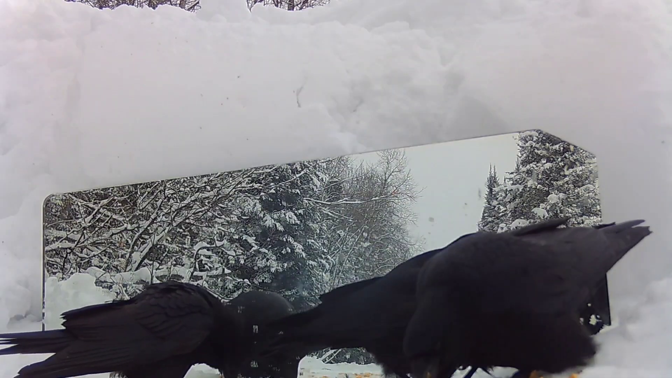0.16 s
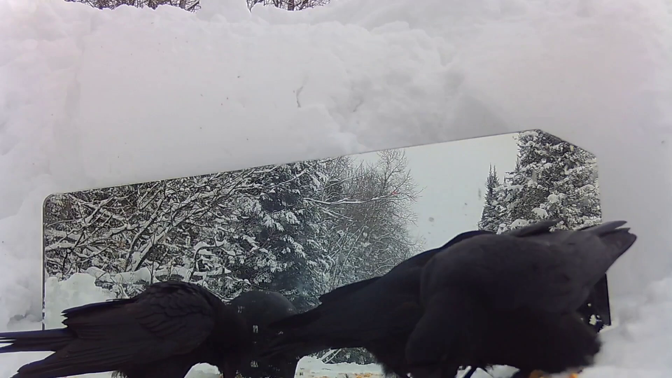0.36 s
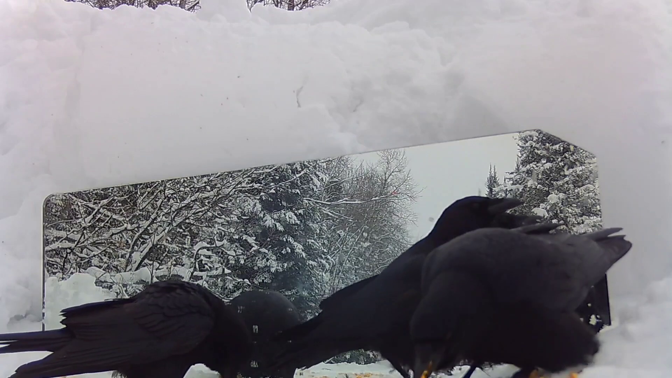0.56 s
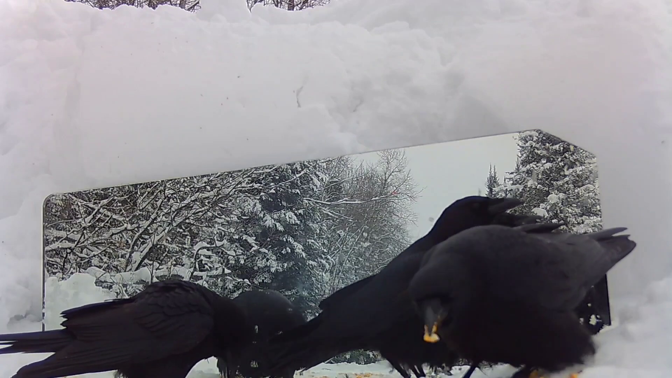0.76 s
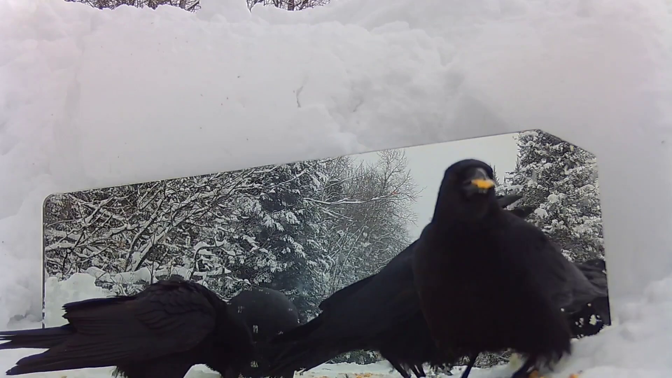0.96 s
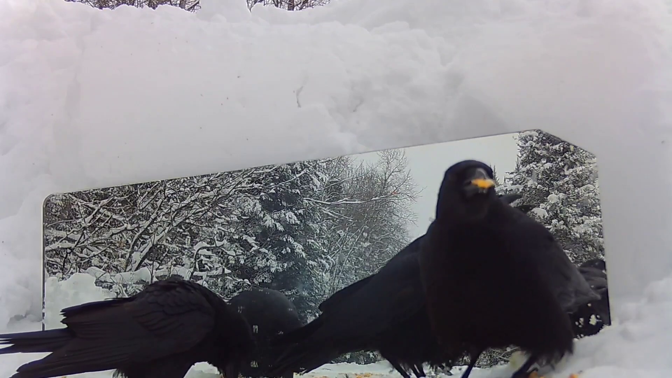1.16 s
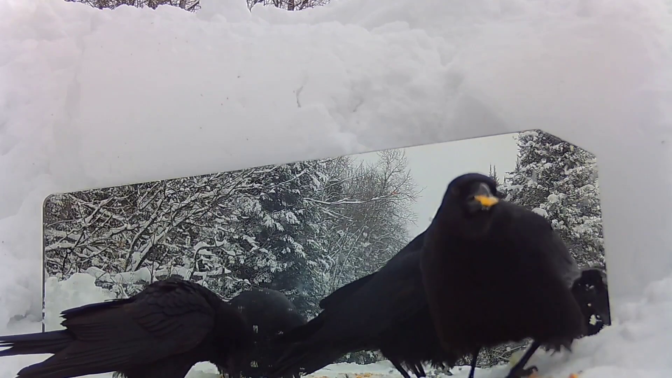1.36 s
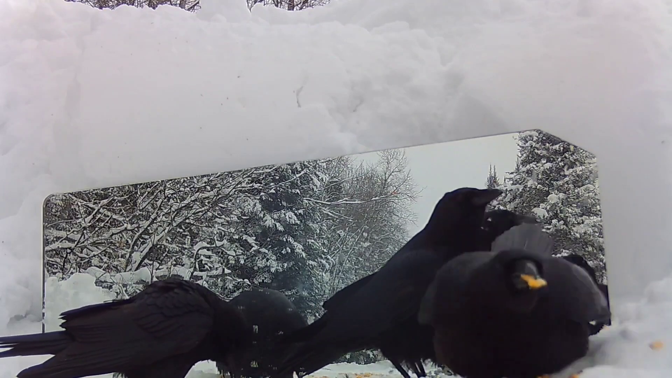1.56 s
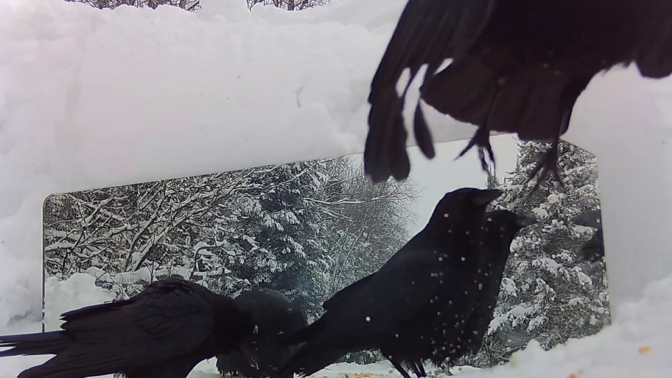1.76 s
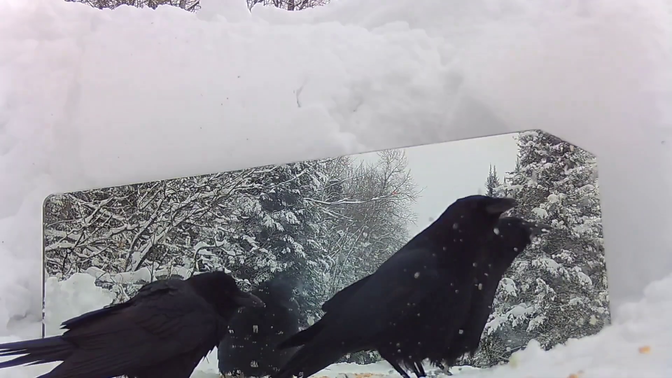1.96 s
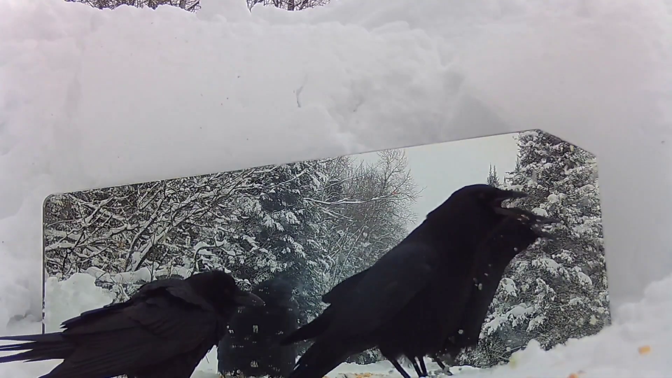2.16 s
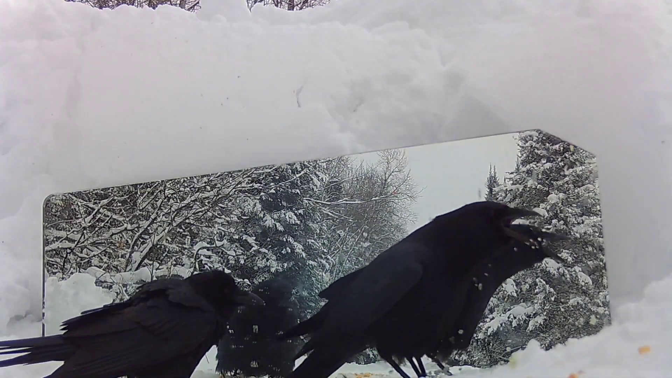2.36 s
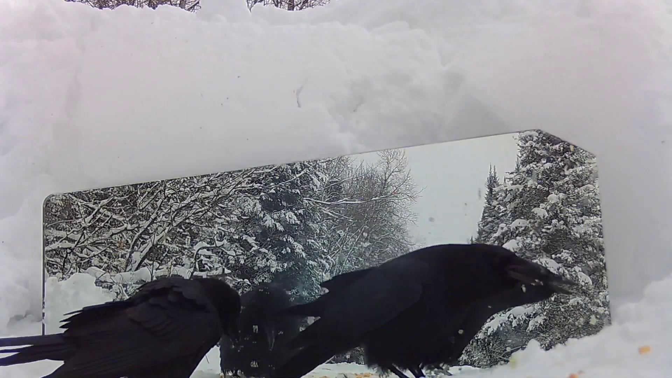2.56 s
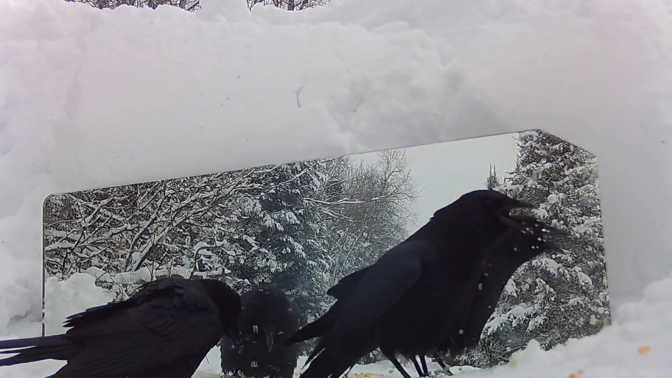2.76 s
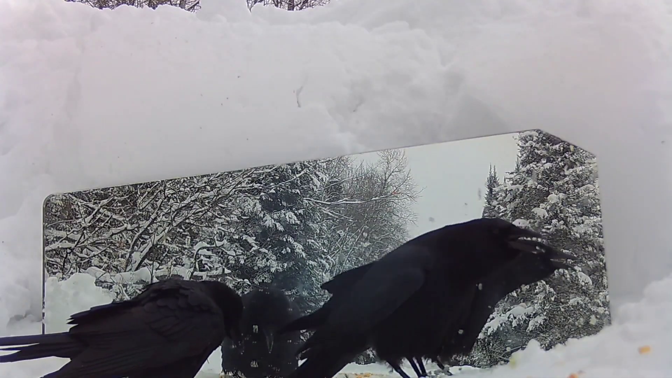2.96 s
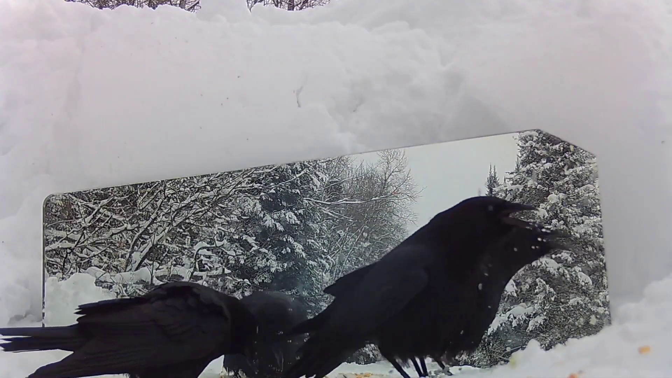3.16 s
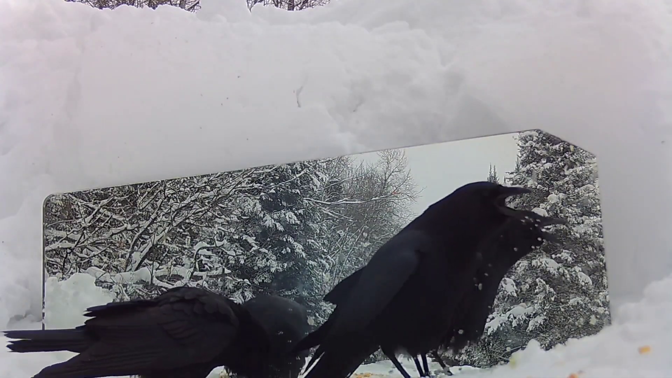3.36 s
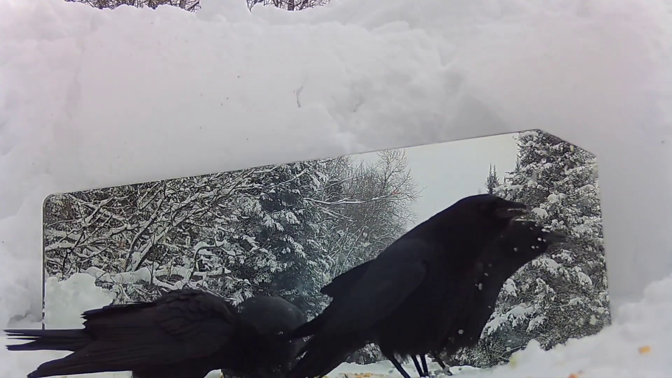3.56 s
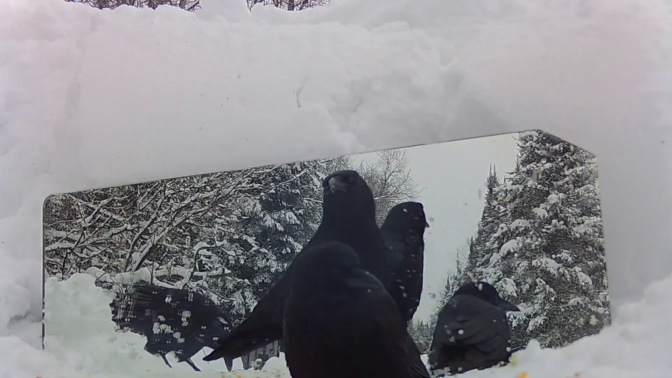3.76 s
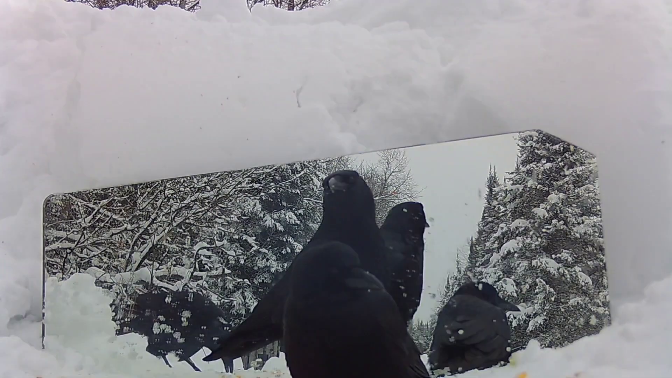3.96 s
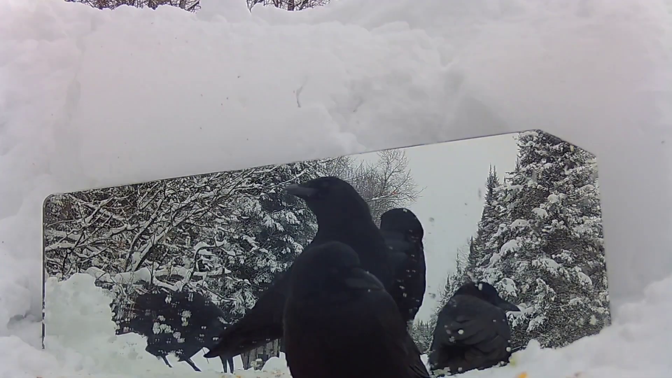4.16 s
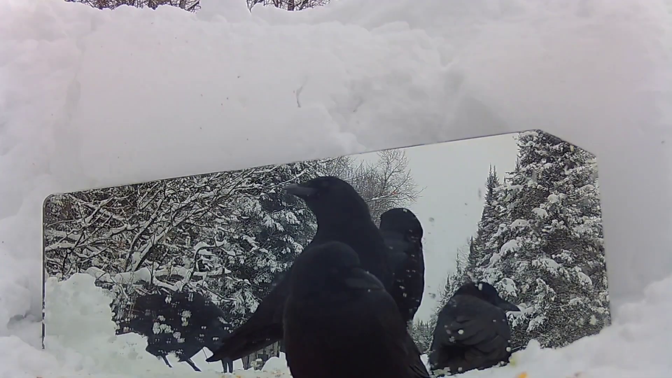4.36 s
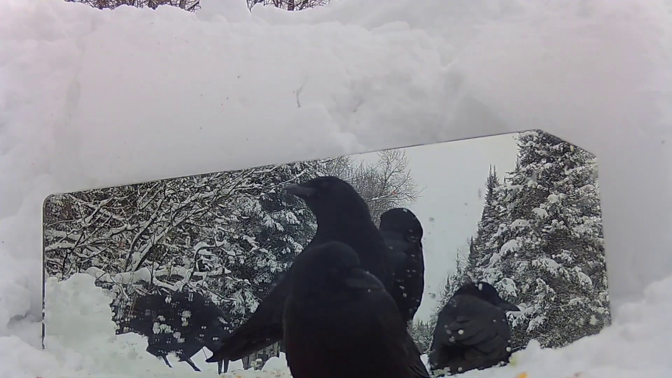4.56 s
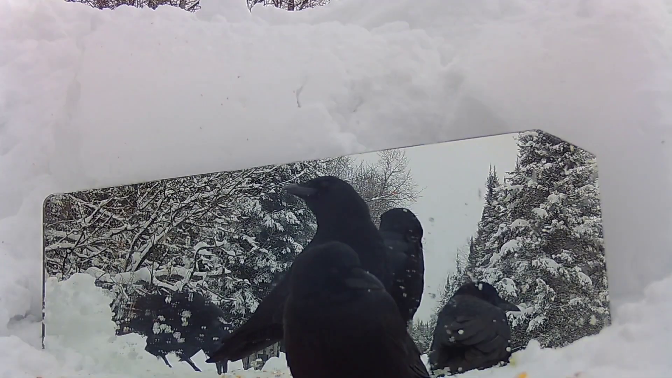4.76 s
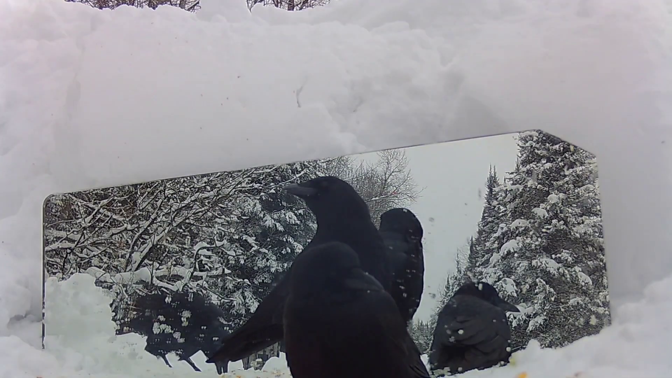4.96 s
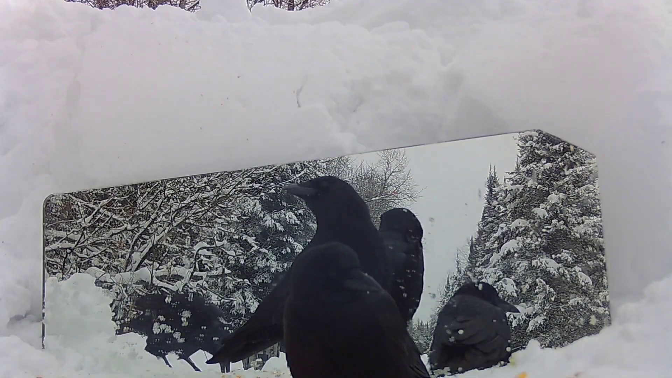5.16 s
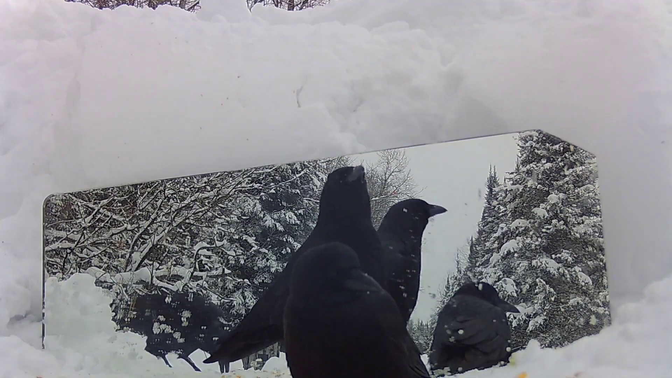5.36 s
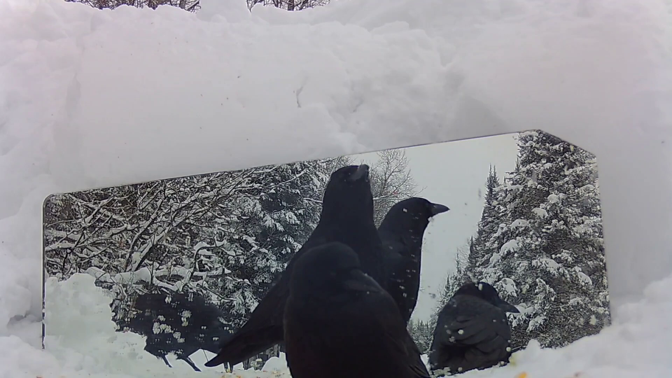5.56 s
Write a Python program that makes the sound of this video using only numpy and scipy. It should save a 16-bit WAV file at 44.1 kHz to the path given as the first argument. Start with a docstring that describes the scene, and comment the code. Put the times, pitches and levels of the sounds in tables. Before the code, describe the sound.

Crows peck faintly at snow over a soft outdoor hiss. One takes off, its wings swishing and buffeting the microphone. Another then caws three times, loud, harsh and so close that the sound distorts slightly, with soft breaths between and a low thump after the first caw. Afterwards a faint distant rumble and a few more light pecks remain.

```python
"""Small pecks over a faint hiss: crows feed on snow beside a microphone. One flies off, its wings swishing and
buffeting the microphone. Another caws three times, breathing in between. Each caw is a train of syrinx snaps
ringing throat and beak, so close that the input overloads; the trees answer faintly. After a brief silence the
scene changes: a distant rumble and a few more pecks."""
import sys
import numpy as np
from scipy import signal
from scipy.fft import rfft, irfft
from scipy.io import wavfile
from scipy.ndimage import map_coordinates

SR = 44100
rng = np.random.default_rng(int(sys.argv[2]) if len(sys.argv) > 2 else 0)


def to_wav(sig):
    """Store sig (one row per channel, or 1-D mono) as 16-bit WAV at the path in sys.argv[1].

    Samples outside -1..1 are clipped; the rate is SR.
    """
    pcm = np.clip(np.atleast_2d(sig), -1, 1) * 32767
    pcm = np.round(pcm).astype(np.int16)
    wavfile.write(sys.argv[1], SR, pcm.T)  # frames by channels


N = 246959
TIME = np.arange(N) / SR
SILENCE_START_S, SILENCE_END_S = 3.7, 3.738


def amp(db):
    """Decibels to gain."""
    return 10 ** (np.asarray(db) / 20)


def unit_rms(x):
    """Scales to rms 1."""
    return x / np.sqrt(np.mean(x ** 2) + 1e-20)


def add(mix, start_s, sound):
    """Adds a sound to the mix at start_s."""
    part = mix[round(start_s * SR):][:len(sound)]
    part += sound[:len(part)]


def noise(spectrum):
    """Noise of rms 1, shaped by rows of (frequency [Hz], level [dB])."""
    hz, db = np.transpose(spectrum)
    gain = amp(np.interp(np.log(np.fft.rfftfreq(N, 1 / SR) + 1), np.log(hz + 1), db))
    return unit_rms(irfft(rfft(rng.standard_normal(N)) * gain, N))


def wander(count, rate_hz):
    """Random drift of rms 1, low-passed at rate_hz."""
    hz = np.fft.rfftfreq(count, 1 / SR)
    return unit_rms(irfft(rfft(rng.standard_normal(count)) / (1 + (hz / rate_hz) ** 4), count))


def swells(rows):
    """One gain curve per row: exponential rise to a peak, exponential fall."""
    return np.array([amp(db) * np.exp(-np.maximum((s - TIME) / rise_s, (TIME - s) / fall_s).clip(0, 50))
                     for s, db, rise_s, fall_s, *_ in rows])


def minimum_phase(db):
    """Spectra of the quickest responses with these gains, one per row."""
    cepstrum = irfft(np.log(amp(db)))
    half = cepstrum.shape[1] // 2
    fold = np.r_[1, np.full(half - 1, 2), 1, np.zeros(half - 1)]
    return np.exp(rfft(cepstrum * fold))


# hiss spectrum: (frequency [Hz], level [dB])
HISS_SPECTRUM = [(20, 5), (36, 5.5), (60, -3.5), (100, 0), (300, -7.5), (600, -9.5), (1500, -12),
                 (7000, -12.5), (16000, -14)]


def hiss(level_db=-59.5):
    """Steady background hiss."""
    return amp(level_db) * noise(HISS_SPECTRUM)


# rumble spectrum: (frequency [Hz], level [dB])
RUMBLE_SPECTRUM = [(22, -3), (43, -4.5), (62, 1), (78, 5.5), (112, -7.5), (150, -4), (180, -9), (262, -6),
                   (340, -14.5), (620, -17), (1300, -16.5), (2600, -31.5), (5000, -62)]


def rumble(level_db=-53, onset_s=.01713, fade_db_per_s=.9639, waver_db=1.0):
    """A far rumble like traffic enters after the silence and slowly recedes."""
    since_s = TIME - SILENCE_END_S
    sound = np.clip(since_s / onset_s, 0, 1) * noise(RUMBLE_SPECTRUM)
    return sound * amp(level_db - fade_db_per_s * since_s - waver_db * wander(N, 13))


# crunch spectrum: (frequency [Hz], level [dB])
PECK_SPECTRUM = [(200, 13.5), (600, -17.5), (1300, -1.5), (2600, -13.5), (4200, -3), (6500, 4), (8500, -3),
                 (11000, -4.5), (15000, -18)]
# pecks, claw taps, feather snaps at take-off: (time [s], relative level [dB], t60 [s], high-pass [Hz])
PECKS = [(.272, -38, .015, 6000), (.281, -31, .04, 900), (.29, -43, .05, 1200), (.956, -40, .05, 300),
         (1.361, -43, .04, 2500), (1.571, -43, .03, 5000), (1.7855, -20, .05, 1400),
         (1.924, -22.5, .03, 1000), (1.985, -27, .04, 1200), (4.3077, -35, .025, 4200),
         (4.7207, -41, .03, 3500), (4.742, -43, .03, 3500), (5.0435, -48, .04, 4000),
         (5.18, -48, .03, 4500), (5.278, -45, .09, 4500)]


def pecks(gain_db=-6):
    """Each tap is a sharp, fast-decaying crunch; light taps lack the low knock."""
    out, crunch, t = np.zeros(N), noise(PECK_SPECTRUM), np.arange(SR // 5) / SR
    for start_s, db, t60_s, low_hz in PECKS:
        tap = crunch[round(start_s * SR):][:len(t)] * amp(db + gain_db - 60 * t / t60_s)
        add(out, start_s, signal.sosfilt(signal.butter(2, low_hz, "high", fs=SR, output="sos"), tap))
    return out


# wing strokes of the departing bird: (time [s], peak [dB], rise [s], fall [s])
WING_STROKES = [(1.58, -58, .05, 0.0519), (1.725, -46.5, 0.039, 0.034), (1.795, -36, 0.016626, 0.038),
                (1.88, -45.5, 0.028, 0.0792), (1.99, -35.5, 0.053, 0.02264), (2.075, -40.5, 0.047, 0.093)]
# wing swish spectrum: (frequency [Hz], level [dB])
WING_SPECTRUM = [(240, -9.5), (400, -9), (777, -9.5), (1090, -11.5), (1510, -9.5), (2290, -11.5),
                 (5350, -5.5), (6440, -1.5), (9320, -5), (14800, -24), (16000, -33)]
# one rustle at take-off, then the crow's breaths: (time [s], peak [dB], rise [s], fall [s])
SOFT_HISSES = [(1.715, -45, 0.03975, 0.041), (2.67, -43.5, .07, 0.009707), (3.01, -49, .03, 0.09675),
               (3.17, -48.5, 0.064, 0.0091), (3.545, -53, .06, .035)]
# their spectrum: (frequency [Hz], level [dB])
SOFT_HISS_SPECTRUM = [(1470, -42), (2500, -11.5), (2850, -19), (3380, -5.5), (4050, -9.5), (5150, -7),
                      (6810, 6), (15200, -27), (16000, -18.5)]


def wings_and_breaths(grain_db=2.5, grain_hz=110):
    """Wings swish and rustle at take-off; the crow's breaths hiss softly between and after caws."""
    wings = np.linalg.norm(swells(WING_STROKES), axis=0) * noise(WING_SPECTRUM)
    hisses = np.linalg.norm(swells(SOFT_HISSES), axis=0) * noise(SOFT_HISS_SPECTRUM)
    return (wings + hisses) * unit_rms(amp(grain_db * wander(N, grain_hz)))


# wing gusts and bass swells: (time [s], peak [dB], rise [s], fall [s], upper edge [Hz])
LOW_THUDS = [(1.72, -44, 0.029, 0.024738, 36), (1.805, -35, 0.009364, 0.041906, 170),
             (1.975, -27, 0.028, .025, 49.98), (2.0, -34, 0.013, 0.017, 120),
             (2.2, -29.5, 0.08202, 0.082, 48), (2.53, -19, .1, .045, 179.8),
             (2.587, -14.5, .006, .014, 176.1), (2.77, -25, 0.03965, 0.12, 53.94),
             (2.962, -28, .012, .055, 70.26), (3.28, -23.5, 0.034, 0.059, 54)]


def low_thuds():
    """Low noise: wing gusts on the microphone, and bass swells where the caws overload the input."""
    power = swells(LOW_THUDS) ** 2
    edge_hz = np.array(LOW_THUDS)[:, -1] @ power / power.sum(0)  # the strongest thud dominates
    bass = noise([(20, 0), (70, -1.5), (200, -5.5), (500, -19.5), (1000, -32), (4000, -77)])
    position = np.cumsum(edge_hz) / 200  # shifts the 200 Hz corner to edge_hz
    return np.sqrt(power.sum(0)) * map_coordinates(bass, [position], order=3, mode="wrap")


def thump(at_s=2.588, width_s=.0029, gain_db=-7):
    """The closest gust lands on the microphone as one push and suck of air."""
    u = (TIME - at_s) / width_s
    return -amp(gain_db) * u * np.exp(-u ** 2 / 2)


def echoes(voice, near_db=-22, near_t60_s=.02, far_db=-43, far_t60_s=.85, build_s=.0091, dull_hz=2300):
    """A snowbank and a mirror scatter a brief echo; tree trunks a faint, dull, longer one."""
    t = np.arange(SR) / SR
    taps = rng.standard_normal(SR) * (rng.random(SR) < .05)
    far = taps * amp(-60 * t / far_t60_s) * (1 - np.exp(-t / build_s))
    far = signal.sosfilt(signal.butter(2, dull_hz, fs=SR, output="sos"), far / np.linalg.norm(far))
    near = taps * amp(-60 * t / near_t60_s)
    response = amp(far_db) * far + amp(near_db) * near / np.linalg.norm(near)
    return signal.fftconvolve(voice, response)[:N]


def gesture(t, length_s, held_hz, lift_hz, release_s, first_db,
            gap_s=.0098, attack_s=.011, accent_s=.075, sag_hz=84.846, sag_db_per_s=7.5, fade_s=.015):
    """Pitch, effort and treble of a caw: lone snap, attack, accent, sagging hold, slackening release."""
    after_gap_s = np.maximum(t - gap_s, 0)
    attack = np.exp(-after_gap_s / attack_s)
    accent = np.exp(-(np.log(t / accent_s + 1e-9) / .6) ** 2)  # swells fast, ebbs slowly
    push = accent ** 2.5  # effort peaks more briefly than pitch
    release = np.exp((t - length_s) / release_s)
    fade = np.exp((t - length_s) / fade_s)
    pitch_hz = held_hz - sag_hz * t / length_s + lift_hz * accent
    pitch_hz = pitch_hz * (1 - .6 * attack) * (1 - .57 * release)
    effort_db = -6 * attack + 6.5 * push - sag_db_per_s * t - 24 * fade
    treble_db = -3 * push - 3 * np.exp(-after_gap_s / .014)  # swells in, dips on the accent
    pitch_hz[t < gap_s] = 1 / gap_s  # lone opening snap
    effort_db[t < gap_s / 2] = first_db
    return pitch_hz, effort_db, treble_db


def syrinx_snaps(clock_s, pitch_hz, flutter, flutter_hz=56, slack_hz=450, jitter=.021):
    """Snap times of the syrinx: hoarsest when taut, fluttering more deeply as it slackens."""
    t = np.arange(clock_s[0], clock_s[-1], 1 / SR)
    hz = np.interp(t, clock_s, pitch_hz)
    angle = 2 * np.pi * np.cumsum(flutter_hz * (1 + .05 * wander(len(t), 30))) / SR
    sway = (np.sin(angle) + .35 * np.sin(2 * angle)) * np.minimum(slack_hz / hz, 1) ** 2
    hoarseness = jitter * (hz / 560) ** 2 * wander(len(t), 400)
    cycles = np.cumsum(hz * (1 + flutter * sway + hoarseness)) / SR
    return np.interp(np.arange(cycles[-1]), cycles, t)


# the throat's single strong resonance: (frequency [Hz], level [dB])
THROAT_RESPONSE = [(60, -33.5), (430, -11), (700, -25), (1020, -15.5), (1280, 3), (1510, -0.5),
                   (1800, -16.5), (2150, -14)]
# the open beak's cluster of resonances: (frequency [Hz], level [dB])
BEAK_RESPONSE = [(2500, -12), (2950, -16.5), (3600, -12.5), (4250, -20.5), (4720, -5.5), (5150, -12),
                 (5600, -1.5), (5950, 1), (6380, -12.5), (6900, -3.5), (7750, -18), (9000, -23.5),
                 (10500, -16), (12000, -35), (17000, -43.5)]


def vocal_tract(hz, throat_scales, beak_scales, lower_db, treble_db, beak_jitter=.015):
    """Throat and beak response at each snap; the beak's resonances shift slightly at random."""
    beak_scales = beak_scales * (1 + beak_jitter * rng.standard_normal(len(beak_scales)))
    beak_hz, beak_db = np.transpose(BEAK_RESPONSE)
    lower_resonance = np.exp(-((beak_hz - 4900) / 520) ** 2)
    gains_db = []
    for throat_scale, beak_scale, lower, treble in zip(throat_scales, beak_scales, lower_db, treble_db):
        throat = np.multiply(THROAT_RESPONSE, [throat_scale, 1])
        beak = np.c_[beak_hz * beak_scale, beak_db + treble + lower * lower_resonance]
        gains_db.append(np.interp(hz, *np.vstack([throat, beak]).T))
    return minimum_phase(gains_db)


# caws: (start [s], length [s], held pitch [Hz], accent lift [Hz], release [s], relative level [dB],
#   first snap [dB], extra treble [dB], flutter depth [ratio], then start and end values of each of:
#   throat frequency scale [ratio], beak frequency scale [ratio], lower beak resonance boost [dB])
CAWS = [(2.148, 0.36534, 515, 130.1, .017, 1.5, -11, -3.5, 0.088, 1.05, 1.04, 1.16, 1.045, 13.7, 3.5),
        (2.697, 0.26, 527.2, 129.5, .024, 1.76, -16, 0.5, .056, 1.0, 1.02, 1.02, 1.005, 2, 0.5),
        (3.203, .266, 529.3, 137.7, .025, 2.3, -17.5, 1, .052, .99, 1.04, 1.0, 1.008, 2, -0.5)]


def caw(row, gain_db=26, shimmer_db=1.74, breath=.033, breath_s=.0012, size=1024):
    """Each syrinx snap, with a small puff of breath, rings throat and beak in their current shape."""
    start_s, length_s, held_hz, lift_hz, release_s, level_db, first_db, bright_db, flutter, *shape = row
    t, hz = np.arange(0, length_s, 1 / SR), np.fft.rfftfreq(size, 1 / SR)
    clock_s = start_s + t
    pitch_hz, effort_db, treble_db = gesture(t, length_s, held_hz, lift_hz, release_s, first_db)
    snaps_s = syrinx_snaps(clock_s, pitch_hz, flutter)
    posture = [np.interp(snaps_s, clock_s[[0, -1]], ends) for ends in np.reshape(shape, (-1, 2))]
    tract = vocal_tract(hz, *posture, bright_db + np.interp(snaps_s, clock_s, treble_db))
    puffs = breath * rfft(rng.standard_normal((len(snaps_s), size)) * np.exp(-TIME[:size] / breath_s))
    lag_s = snaps_s - (np.round(snaps_s * SR) - size // 64) / SR
    delay = np.exp(-2j * np.pi * hz * lag_s[:, None])  # sub-sample timing
    rings = irfft((1 + puffs) * tract * delay)
    snaps_db = gain_db + level_db + np.interp(snaps_s, clock_s, effort_db)
    snaps_db += shimmer_db * rng.standard_normal(len(snaps_s))
    out = np.zeros(N)
    for snap_s, db, ring in zip(snaps_s, snaps_db, rings):
        add(out, snap_s, amp(db) * ring[:size // 2])
    return out


def scene():
    """Mono mix of all sources; the echo stops at the silence."""
    voice = sum(caw(row) for row in CAWS)
    echo = echoes(voice) * (TIME < SILENCE_START_S)
    return (voice + echo + wings_and_breaths() + low_thuds() + thump() + pecks() + rumble() + hiss())[None]


def record(dry, ceiling=.74, knee=4.5, low_hz=14, high_hz=15800):
    """The overloaded input flattens the caws' peaks; then bass cut, brief silence and band limit."""
    oversampled = signal.resample_poly(dry, 4, 1, axis=1)
    clipped = oversampled / (1 + abs(oversampled / ceiling) ** knee) ** (1 / knee)
    out = signal.resample_poly(clipped, 1, 4, axis=1)
    out = signal.sosfilt(signal.butter(1, low_hz, "high", fs=SR, output="sos"), out)
    out *= (TIME < SILENCE_START_S) | (TIME > SILENCE_END_S)
    lowpass = signal.firwin(511, high_hz, window=("kaiser", 8), fs=SR)
    return signal.oaconvolve(out, lowpass[None], "same")


dry = scene()
out = record(dry)
to_wav(out)
```